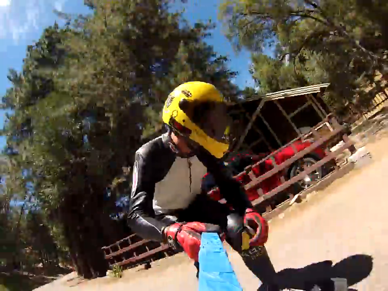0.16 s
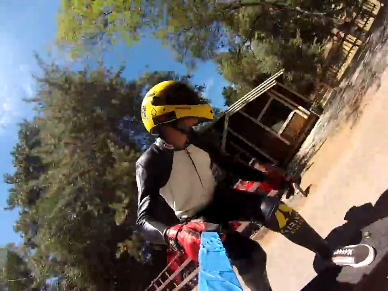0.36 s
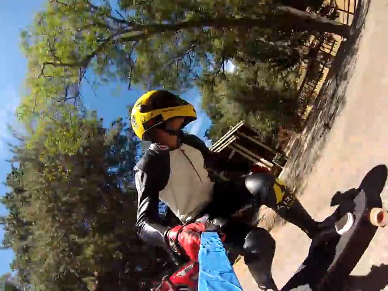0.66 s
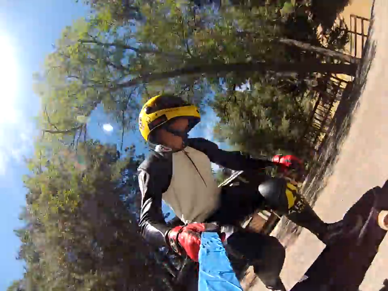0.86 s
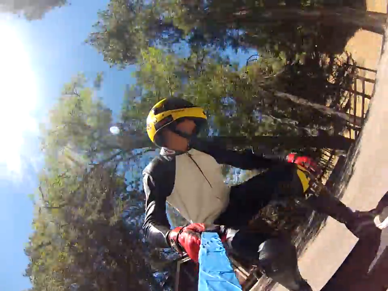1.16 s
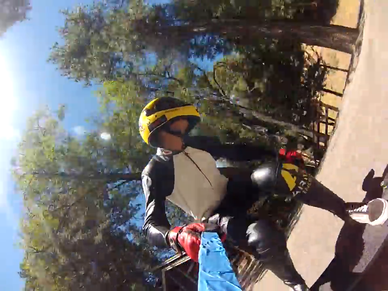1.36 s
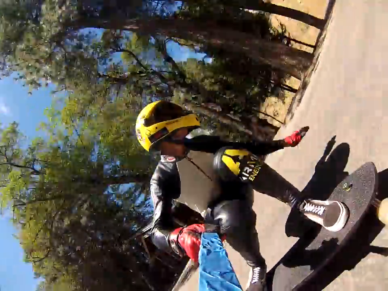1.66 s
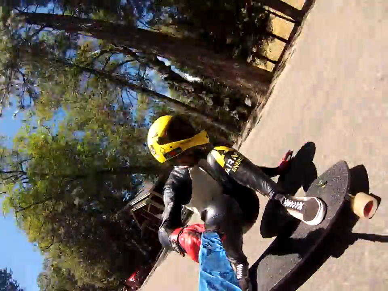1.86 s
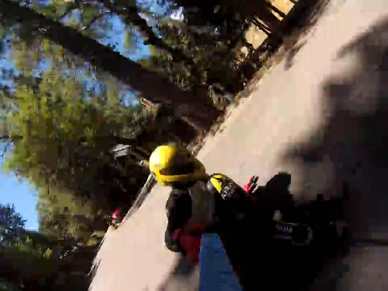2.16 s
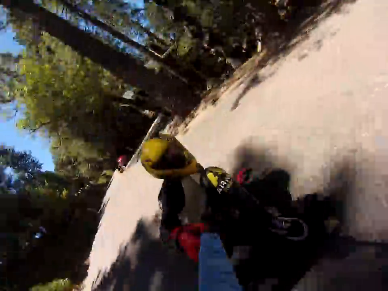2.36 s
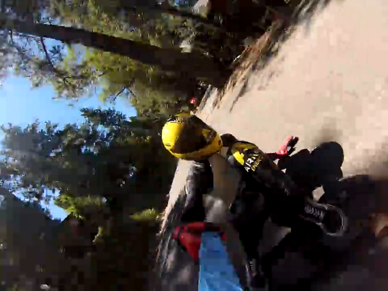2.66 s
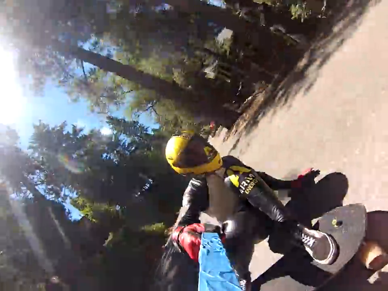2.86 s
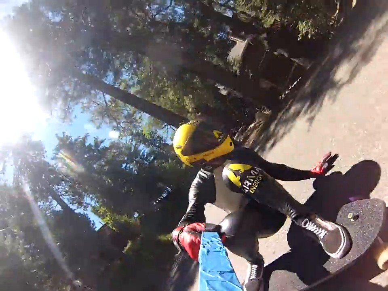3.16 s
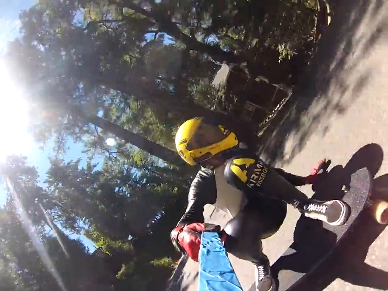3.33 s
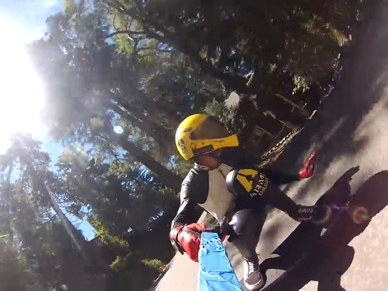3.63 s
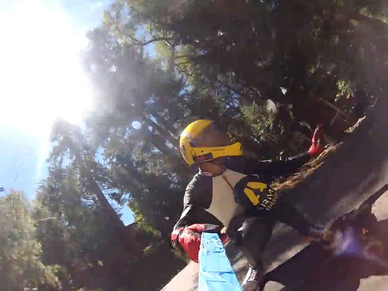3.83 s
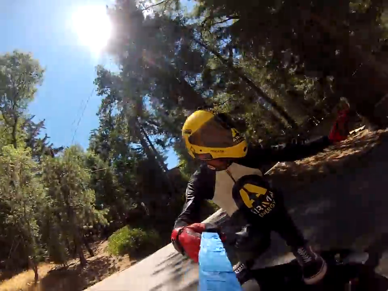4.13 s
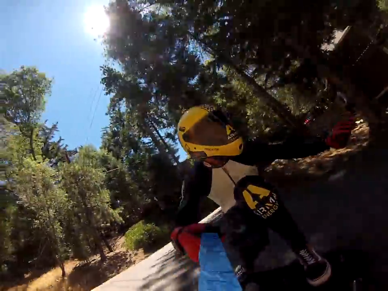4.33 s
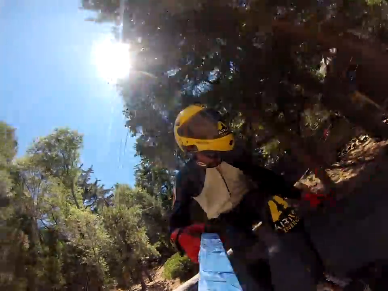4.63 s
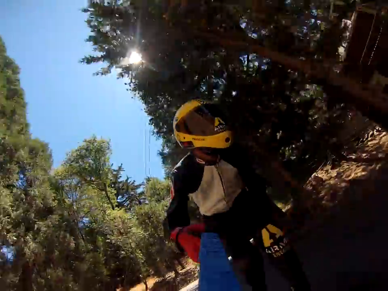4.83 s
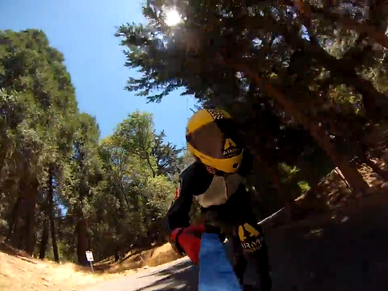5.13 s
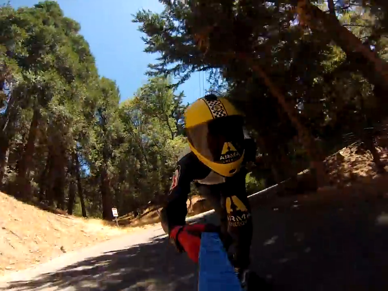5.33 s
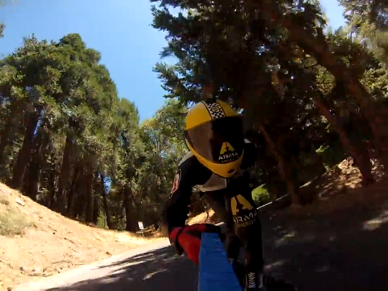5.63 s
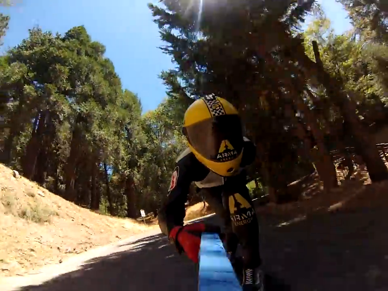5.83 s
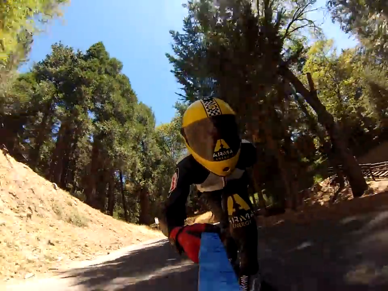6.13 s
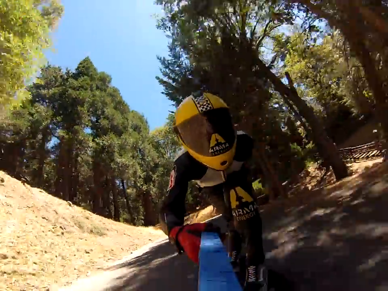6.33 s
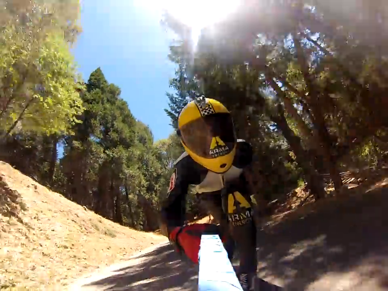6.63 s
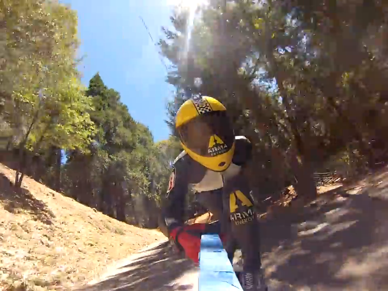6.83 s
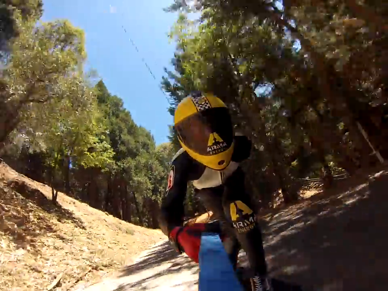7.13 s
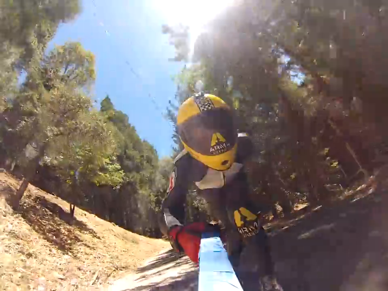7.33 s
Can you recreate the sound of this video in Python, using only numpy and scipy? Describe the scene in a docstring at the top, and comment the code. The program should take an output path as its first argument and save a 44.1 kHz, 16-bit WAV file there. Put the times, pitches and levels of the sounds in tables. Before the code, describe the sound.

Heavy low wind flutter and handling clatter come first, one knock standing out. Wheels rumble and ring on coarse pavement, then slide through a bend with a bright tearing scrape and deeper deck growl. The scrape fades to a faint whistle and quiet rolling, soft air puffs and scuffs follow, a sharp tick cracks, and the steady roll returns. Mostly central, very close, dry open air.

```python
"""A gust and a glove's rub on a pole come first, then sharp ticks and knocks, over a longboard on rough asphalt.
The rider holds a camera on that pole: eddies rock the air at its microphone and hits ring its housing.
Random road grain rings wheels, deck and a bright grit hiss; rushing air adds a broad roar.
In a long bend the wheels scrub sideways in a dense stick-slip hiss, then grip and roll on.
"""
import sys
import numpy as np
from scipy import signal
from scipy.fft import rfft, irfft
from scipy.io import wavfile
from scipy.ndimage import uniform_filter1d, map_coordinates

SR = 44100
rng = np.random.default_rng(int(sys.argv[2]) if len(sys.argv) > 2 else 0)


def log_audio(samples):
    """Write samples as a 16-bit WAV file to the path given in sys.argv[1]."""
    # one column per channel
    frames = np.atleast_2d(samples).T
    # limit to full scale, then quantise
    limited = np.clip(frames, -1, 1)
    pcm = np.round(limited * 32767).astype(np.int16)
    wavfile.write(sys.argv[1], SR, pcm)


N = 330309
TIME = np.arange(N) / SR
HZ = np.fft.rfftfreq(N, 1 / SR)


def amp(db):
    """Decibels to gain."""
    return 10 ** (np.asarray(db) / 20)


def evened(x):
    """Scales to unit rms."""
    return x / np.sqrt(np.mean(x ** 2) + 1e-20)


def level(rows):
    """Gain over time from a curve of decibels."""
    s, db = np.transpose(rows)
    return amp(np.interp(TIME, s, db))


def shape(points):
    """Gain over frequency from a short spectrum, drawn on a log axis."""
    hz, db = np.transpose(points)
    return amp(np.interp(np.log(HZ + 1), np.log(hz), db))


def body(modes, bed):
    """Gain over frequency of steep resonances standing on a broad bed."""
    peaks = 0
    for hz, width, db in modes:
        peaks = peaks + amp(db) ** 2 / (1 + ((HZ - hz) / width) ** 2 * 2) ** 2
    return np.sqrt(peaks + shape(bed) ** 2)


def ring(x, gain):
    """Passes x through a causal (minimum-phase) filter of this gain, so that clicks ring after they land."""
    cepstrum = irfft(np.log(gain + 1e-6), N)
    cepstrum[1:N // 2] *= 2
    cepstrum[N // 2:] = 0
    return irfft(rfft(x) * np.exp(rfft(cepstrum)), N)


def coloured(points):
    """Plain noise with this spectrum."""
    return irfft(rfft(rng.standard_normal(N)) * shape(points), N)


def tinted(x, bands):
    """Lifts or cuts narrow bands of a sound."""
    gain_db = sum(db / (1 + ((HZ - hz) / half_width) ** 2) for hz, half_width, db in bands)
    return ring(x, amp(gain_db))


def wander(rate_hz):
    """Slow random drift of unit rms, up to about this rate."""
    return evened(irfft(rfft(rng.standard_normal(N)) / (1 + (HZ / rate_hz) ** 2), N))


def grains(per_s, spread_db):
    """Random clicks from stones; a positive spread makes a few much larger, a negative one a few smaller."""
    size = amp(spread_db * np.minimum(rng.exponential(1, N), 4))
    sign = rng.choice([-1, 1], N)
    lands = rng.random(N) < per_s / SR
    return evened(size * sign * lands)


def bent(x, ratio):
    """Bends the pitch of a sound by a ratio that changes over time."""
    return map_coordinates(x, [np.cumsum(ratio)], order=3, mode="wrap")


def patchy(x, patchy_db, size):
    """Each region of the spectrum swells and sinks on its own, as the contact patch keeps changing."""
    z = signal.stft(x, nperseg=512, noverlap=384)[2]
    patches = uniform_filter1d(rng.standard_normal(z.shape), size=size[0], axis=0)  # across frequency
    patches = uniform_filter1d(patches, size=size[1], axis=1)  # across time
    return signal.istft(z * amp(patchy_db * evened(patches)), nperseg=512, noverlap=384)[1][:N]


def held(start, attack, end, release):
    """Rises from zero to one, holds, and is back at zero by the end."""
    return np.clip(np.minimum((TIME - start) / attack, (end - TIME) / release), 0, 1)


def swell(length, lean):
    """A smooth hump of this length; a lean under one brings its top forward."""
    return np.sin(np.pi * np.linspace(0, 1, round(max(length, .004) * SR)) ** lean) ** 2


def bump(middle, length):
    """A smooth rise to one and back, around this moment."""
    return np.cos(np.pi * np.clip((TIME - middle) / length, -.5, .5)) ** 2


def add(mix, s, sound):
    """Mixes a sound in at time s."""
    part = mix[max(round(s * SR), 0):][:len(sound)]
    part += sound[:len(part)]


def strike(modes, t):
    """Decaying modes after one blow, with a peak of one."""
    sound = 0
    for k, (hz, db, t60) in enumerate(modes):
        decay = np.exp(-np.log(1000) * t / t60)
        sound = sound + (-1) ** k * amp(db) * decay * np.sin(2 * np.pi * hz * t)
    return sound / abs(sound).max()


# the rider crouches into the bend, bringing the camera near the deck and out of the wind, then stands up
CROUCH_START_S, CROUCH_DOWN_S, CROUCH_END_S, CROUCH_UP_S = 0.037, 0.33, 5.09, 0.35


def crouching():
    """Zero while the rider stands, one in the crouch."""
    return held(CROUCH_START_S, CROUCH_DOWN_S, CROUCH_END_S, CROUCH_UP_S)


# the slide: the wheels break loose in the bend, and grip again
SLIDE_START_S, SLIDE_BREAK_S, SLIDE_END_S, SLIDE_GRIP_S = 1.56, 0.4, 3.62, 0.28


def drifting(fade):
    """Zero while the wheels grip, one while they slide."""
    return held(SLIDE_START_S, fade, SLIDE_END_S, fade)


# slow wind pressure on the microphone, before the wind trim: time_s, level_db
WIND_PRESSURE = [(0.4, -30.5), (1.5, -30.5), (2.45, -20), (3.0, -27.5), (4.7, -33.5), (5.6, -27),
                 (6.0, -31.5), (7.49, -37.5)]
# gusts on top of it, the first as the pole swings round: middle_s, level_db, length_s
WIND_GUSTS = [(0.097, -12.5, 0.22), (0.235, -15, 0.24), (0.936, -21.5, 0.13), (1.863, -29.5, 0.5),
              (2.17, -16.5, 0.047), (2.846, -25, 0.14), (3.167, -26.5, 0.14), (3.358, -23, 0.048),
              (5.076, -22.5, 0.04), (7.31, -31, 0.064)]
# spectrum of the wind pressure: frequency_hz, level_db
WIND_SPECTRUM = [(8, -30), (20, 0.5), (30, 4), (37, 0), (48, -11), (64, -20.5), (90, -28.5), (140, -38),
                 (300, -40.5), (1000, -101.5)]


def buffeting(wind_db=-1.0, steadiness=0.34, flutter_db=1.5):
    """Eddies shed by the camera rock the air about thirty times a second, harder in each gust."""
    swirl = signal.hilbert(coloured(WIND_SPECTRUM))
    strength = np.sqrt(uniform_filter1d(abs(swirl) ** 2, size=2200))
    pressure = level(WIND_PRESSURE) * amp(flutter_db * wander(rate_hz=8.4))
    for s, db, length in WIND_GUSTS:
        pressure = pressure + amp(db) * bump(s, length)
    # dividing by part of its own strength steadies the swirl
    return evened(swirl.real / strength ** steadiness) * pressure * amp(wind_db)


# rubs of the glove as the pole swings round, before the rub trim: start_s, level_db, length_s
GLOVE_RUBS = [(0.0, -29.5, 0.086), (0.047, -34, 0.059), (0.129, -30, 0.086), (0.188, -35, 0.12),
              (0.264, -36, 0.099)]
# spectrum of leather on the pole: frequency_hz, level_db
LEATHER_SPECTRUM = [(100, -8), (380, 3.5), (850, -10.5), (1100, -4), (1350, 4.5), (1850, -11), (2200, -5.5),
                    (2800, -18.5), (3450, -21), (4100, -33), (15000, -52)]


def rubbing(rub_db=-1.5, lean=0.32, catch_db=1.5):
    """Leather catches and slips on the pole in a dull, uneven rasp."""
    force = np.zeros(N)
    for s, db, length in GLOVE_RUBS:
        add(force, s, amp(db + rub_db) * swell(length, lean))
    slips = grains(per_s=4000, spread_db=2.0) * amp(catch_db * wander(rate_hz=97))
    return force * evened(ring(slips, shape(LEATHER_SPECTRUM)))


# before the bend the wheels ring flatter and wider; change of colour: frequency_hz, half_width_hz, change_db
ENTRY_TINT = [(1195, 53, 4.5), (1380, 66, -3.5), (2370, 220, 8.5), (2670, 97, -9), (3700, 200, 3)]
ENTRY_END_S, ENTRY_FADE_S = 2.05, 0.71


def entering(wheels):
    """The wheels' flatter ring gives way to a narrower one as the bend begins."""
    share = np.clip((ENTRY_END_S - TIME) / ENTRY_FADE_S, 0, 1)
    return share * tinted(wheels, ENTRY_TINT) + (1 - share) * wheels


# the load of the bend presses the deck's growl lower and louder, and leaves more slowly than it comes
LOAD_PEAK_S, LOAD_WIDTH_S, LOAD_EASE_S = 2.42, 0.4, 0.6
LOAD_SAG, LOAD_DB = 0.13, 2.5  # share of the pitch lost, and lift, at the peak


def loaded(deck):
    """Lowers the deck's pitch and lifts its level with the load in the bend."""
    width = np.where(TIME < LOAD_PEAK_S, LOAD_WIDTH_S, LOAD_EASE_S)
    load = np.exp(-((TIME - LOAD_PEAK_S) / width) ** 2)
    return bent(deck, 1 - LOAD_SAG * load) * amp(LOAD_DB * load)


# strength of the road's vibration in the wheels: time_s, level_db
ROAD_DRIVE = [(0.33, -50), (0.53, -46), (0.69, -43), (0.89, -44.5), (1.44, -46), (1.64, -43.5),
              (2.14, -34.5), (2.82, -37), (2.98, -39.5), (3.38, -48), (3.6, -52.5), (3.9, -56), (4.14, -55),
              (4.44, -49.5), (5.6, -43.5), (6.05, -44.5), (6.45, -46), (6.68, -44), (6.98, -47),
              (7.22, -41.5), (7.49, -47.5)]
CRUISE_DB = -43.5  # reference drive, at which grit hiss and rushing air are neither raised nor lowered
# resonances of the rolling wheels: frequency_hz, width_hz, level_db
WHEEL_RESONANCES = [(1170, 110, -11), (1351, 100, 0), (1492, 220, -2), (2085, 170, -11), (2322, 71, -11),
                    (2736, 150, -10.5), (3260, 124, -19)]
# noise between the wheel resonances: frequency_hz, level_db
WHEEL_NOISE = [(60, -30), (170, -18), (500, -18), (850, -25), (1030, -3.5), (1800, -12.5), (3000, -31.5),
               (5000, -35.5), (15000, -70)]
# resonances of the loaded deck: frequency_hz, width_hz, level_db
DECK_RESONANCES = [(328, 180, -7.5), (431, 77, 2.5), (489, 88, 4.5), (730, 65, -11)]
# noise between the deck resonances: frequency_hz, level_db
DECK_NOISE = [(40, -28), (68, 1), (150, -10.5), (270, -5.5), (600, -2), (1000, -28), (4000, -71)]
# resonances that fine grit excites: frequency_hz, width_hz, level_db
GRIT_RESONANCES = [(3700, 850, 3), (4090, 240, 7), (4700, 120, -0.5), (5090, 120, 2.5), (5840, 170, 2.5),
                   (6120, 1050, -1), (6810, 360, -3), (7850, 530, -3.5), (11700, 620, -15)]
# noise between the grit resonances: frequency_hz, level_db
GRIT_NOISE = [(500, -26), (2500, 12.5), (4500, -16), (8500, -8), (10500, -15.5), (15000, -17.5)]
# the grit hiss comes up as the camera swings down towards the road
SWING_S, SWING_DB = 0.52, -3.5
# on the straight the board gathers speed and the grit hiss grows
STRAIGHT_S, GATHER_DB_PER_S = 5.6, 1.5


def rolling(road, ring_db=1.0, growl_db=-18.5, grit_db=-59, near_growl_db=14.5, near_grit_db=6.0, grit_follow=0.55,
            ring_sway_db=1.2, grit_sway_db=1.37, slide_db=-14, waver=0.014, flutter_db=1.0):
    """Road grain rings wheels, deck and grit; coarser patches lift all three, the crouch lifts deck and grit."""
    drive, near = level(ROAD_DRIVE), crouching()
    wheels = evened(ring(grains(per_s=5000, spread_db=2.5), body(WHEEL_RESONANCES, WHEEL_NOISE)))
    # the wheels' ring wavers and flutters as the load shifts between them
    wheels = bent(wheels, 1 + waver * wander(rate_hz=9.06)) * amp(flutter_db * wander(rate_hz=15))
    wheels = entering(wheels) * amp(ring_db)
    deck = evened(ring(grains(per_s=3000, spread_db=-1.5), body(DECK_RESONANCES, DECK_NOISE)))
    deck = loaded(deck) * amp(growl_db + near_growl_db * near)
    low = drive * (wheels + deck) * amp(ring_sway_db * road)

    grit = evened(ring(grains(per_s=7600, spread_db=2.5), body(GRIT_RESONANCES, GRIT_NOISE)))
    grit = grit * amp(slide_db * drifting(fade=0.98))  # sliding wheels pick up less grit
    grit = grit * (drive / amp(CRUISE_DB)) ** grit_follow
    grit = grit * amp(SWING_DB * np.maximum(1 - (TIME / SWING_S) ** 2, 0))
    grit = grit * amp(GATHER_DB_PER_S * np.maximum(TIME - STRAIGHT_S, 0))
    return low + grit * amp(grit_db + near_grit_db * near + grit_sway_db * road)


# spectrum of the rushing air: frequency_hz, level_db
RUSH_SPECTRUM = [(60, -3), (200, 7), (450, -2), (750, 1), (1050, 1.5), (1800, -37), (5000, -31.5)]


def rushing(rush_db=-52.5, sway_db=2.0, shelter_db=-7, follow=0.39):
    """Air round rider and pole roars, flutters and grows with the rolling; the crouch shelters the camera."""
    roar = evened(coloured(RUSH_SPECTRUM)) * (level(ROAD_DRIVE) / amp(CRUISE_DB)) ** follow
    return roar * amp(rush_db + sway_db * wander(rate_hz=18.0) + shelter_db * crouching())


# spectrum of the hiss that differs between the channels: frequency_hz, level_db
HISS_SPECTRUM = [(100, -8), (1500, -25), (4000, -8), (7500, 5), (15000, 4.5)]
HISS_DB = -81.5


def hissing(crosswind_db=-53, crosswind_s=0.38, lean=0.75):
    """What differs between left and right: faint hiss, and a flutter of crosswind as the pole swings round."""
    out = evened(coloured(HISS_SPECTRUM)) * amp(HISS_DB)
    gust = swell(crosswind_s, lean)
    add(out, 0, amp(crosswind_db) * gust * evened(coloured(EDDY_SPECTRUM))[:len(gust)])
    return out


# large eddies that break on the microphone: start_s, peak_db, centre_hz (top_ratio sets the cutoff above it)
EDDIES = [(0.03, -19.5, 69.3), (0.128, -30, 172), (0.286, -23, 150), (0.901, -27.5, 110), (1.8, -30, 85),
          (2.66, -24.5, 300), (2.755, -25, 79.5), (3.768, -36, 603), (3.812, -38, 238), (3.926, -39, 260),
          (4.056, -35.5, 220), (4.156, -32, 170), (4.549, -38.5, 380), (4.739, -30.5, 150),
          (4.836, -27, 188), (5.042, -28.5, 144), (5.179, -29, 287), (5.282, -25.5, 170), (5.326, -23, 137),
          (5.402, -25, 119)]
# spectrum of an eddy: frequency_hz, level_db
EDDY_SPECTRUM = [(30, -5.5), (85, 7.5), (150, 0.5), (290, -1.5), (450, 1.5), (800, -8), (2000, -23)]
EDDY_S = 0.042  # length of one eddy


def puffs(puff_db=0.0, lean=0.52, top_ratio=1.12):
    """Single eddies hit the microphone, each a soft, short thud of low noise."""
    out, hump = np.zeros(N), swell(EDDY_S, lean)
    noise = coloured(EDDY_SPECTRUM)
    for s, db, hz in EDDIES:
        dull = signal.lfilter(*signal.butter(3, top_ratio * hz, fs=SR), noise)
        thud = hump * dull[round(s * SR):][:len(hump)]
        add(out, s, amp(db + puff_db) * thud / abs(thud).max())
    return out


# sharp ticks, before the trims of tick and crack: start_s, level_db, treble_share_db
SHARP_TICKS = [(0.08, -13, -25.5), (0.2378, -29, -26), (0.317, -22.5, -30), (0.8148, -27.5, -27),
               (1.039, -28.5, -36), (1.234, -25, -32), (1.442, -37, -25), (1.5976, -23.5, -27),
               (1.9094, -28, -15), (2.094, -25, -27), (2.1966, -20, -26), (2.532, -16.5, -42),
               (2.668, -22.5, -47), (3.0031, -23, -36), (3.5077, -38, -17), (3.548, -33, -19),
               (4.1188, -29.5, -54), (4.7576, -34, -33), (4.917, -35, -24), (4.9742, -37, -45),
               (5.3828, -14, -19)]
# ringing of the camera housing, detuned at each hit: frequency_hz, level_db, t60_s
HOUSING_MODES = [(1340, 0, 0.012), (2045, 5, 0.0043), (2424, -0.5, 0.012), (2870, -13, 0.023),
                 (3300, -14, 0.016), (4550, -24, 0.029)]
# highest ringing of the housing, brought in by the treble share: frequency_hz, level_db, t60_s
CRACK_MODES = [(7850, -3, 0.0073), (8820, -2, 0.005), (11100, -1, 0.0031), (14800, -11, 0.0059)]


def ticks(tick_db=3.0, crack_db=6.0, detune=0.054, rattle_db=-9.0, rattle_s=0.0035,
          low_hz=1400, high_hz=3000, contact_s=0.000084):
    """Hard little hits: a treble crack, a contact rattle and a brief housing ring, varying with the spot."""
    out, t = np.zeros(N), np.arange(SR // 20) / SR
    spots = 1 + detune * (2 * rng.random((len(SHARP_TICKS), len(HOUSING_MODES))) - 1)
    contacts = rng.standard_normal((len(SHARP_TICKS), len(t))) * np.exp(-t / rattle_s)
    rattles = signal.lfilter(*signal.butter(2, [low_hz, high_hz], "bandpass", fs=SR), contacts)
    onset = 1 - np.exp(-t / contact_s)
    for (s, db, treble_db), spot, rattle in zip(SHARP_TICKS, spots, rattles):
        modes = [(hz * k, mode_db, t60) for (hz, mode_db, t60), k in zip(HOUSING_MODES, spot)]
        hit = amp(tick_db) * strike(modes, t) * onset
        hit = hit + amp(rattle_db) * rattle / abs(rattle).max()
        crack = amp(treble_db + crack_db) * strike(CRACK_MODES, t)
        add(out, s, amp(db) * (hit + crack))
    return out


def blows(rows, modes, rattle, rattle_s=0.012):
    """Blows on one set of modes, each with a contact rattle; a higher pitch ratio also rings shorter."""
    out, t = np.zeros(N), np.arange(SR // 10) / SR
    contact = swell(rattle_s, lean=0.69)
    for (s, db, pitch), chatter in zip(rows, rng.standard_normal((len(rows), len(t)))):
        impact = np.r_[1, rattle * contact * chatter[:len(contact)]]
        sound = np.convolve(strike(modes, t * pitch), impact)
        add(out, s, amp(db) * sound / abs(sound).max())
    return out


# dull knocks, before the knock trim: start_s, level_db, pitch_ratio
POLE_KNOCKS = [(0.1375, -27, 1.1), (0.159, -8, 0.977), (0.2109, -21, 1.18), (0.2436, -29, 1.07),
               (0.2743, -33, 1.03), (0.2915, -31, 1.06), (2.5302, -19.5, 1.25), (4.1186, -35, 1.17)]
# ringing of the pole at a pitch ratio of one: frequency_hz, level_db, t60_s
POLE_MODES = [(393, -2, 0.015), (724, -5, 0.026), (1188, 4, 0.024), (1340, 3.5, 0.015), (1690, -7, 0.019),
              (2260, -22, 0.02)]
# jolts that thump through board and pole: start_s, peak_db, pitch_ratio
ROAD_JOLTS = [(0.1372, -23, 0.75), (0.2187, -20.5, 1.12), (0.9098, -30, 1.5), (2.1652, -21, 1.66),
              (2.246, -24.5, 1.35), (2.5303, -16.5, 1.15), (2.6655, -23, 1.4)]
# the pole's low bending modes at a pitch ratio of one: frequency_hz, level_db, t60_s
FLEX_MODES = [(210, 2.5, 0.025), (311, -3.5, 0.042)]


def knocks(knock_db=0.5, jolt_db=0.0):
    """The pole knocks now and then, and flexes with a thump at each jolt."""
    grip = amp(knock_db) * blows(POLE_KNOCKS, POLE_MODES, rattle=0.044)
    return grip + amp(jolt_db) * blows(ROAD_JOLTS, FLEX_MODES, rattle=0.031)


# grit pinched under a wheel: start_s, peak_db, pitch_hz
GRIT_CHIRPS = [(1.441, -46, 4806), (2.098, -39, 5500), (3.101, -33, 5200), (3.158, -32, 5140),
               (7.1915, -43.5, 6000), (7.199, -52, 5850)]
CHIRP_S, CHIRP_WIDTH = 0.0086, 0.073  # length, and half the bandwidth as a share of the pitch


def chirps(chirp_db=0.0, lean=0.34):
    """A pinched stone squeaks for an instant in a narrow, high band."""
    out, hump = np.zeros(N), swell(CHIRP_S, lean)
    for (s, db, hz), slips in zip(GRIT_CHIRPS, rng.standard_normal((len(GRIT_CHIRPS), SR // 10))):
        band = signal.butter(2, [hz * (1 - CHIRP_WIDTH), hz * (1 + CHIRP_WIDTH)], "bandpass", fs=SR)
        squeak = hump * signal.lfilter(*band, slips)[-len(hump):]
        add(out, s, amp(db + chirp_db) * squeak / abs(squeak).max())
    return out


# resonances of the scrubbing wheels: frequency_hz, width_hz, level_db
SCRUB_RESONANCES = [(1390, 45, 12.5), (2059, 115, 11), (2530, 570, 4.5), (3050, 67, -2), (3200, 46, 7),
                    (3390, 300, 3.5), (4145, 150, -0.5), (4580, 120, -5.5), (5030, 210, -0.5),
                    (6000, 600, -10), (6640, 1000, -8.5), (7900, 270, -24)]
# noise between the scrub resonances: frequency_hz, level_db
SCRUB_NOISE = [(200, -31), (700, 3), (900, -6.5), (1800, -23), (3800, -1), (5500, -16), (8000, -11.5),
               (8500, -20.5), (12000, -23.5), (15000, -28.5)]
# base level, how far it falls towards grip, and how far it eases late as speed is shed
SCRUB_DB, SCRUB_RANGE_DB, SCRUB_EASE_DB = -36, 18.5, 14.5
# the edge of the wheels bites once as they break loose
BITE_S, BITE_WIDTH_S, BITE_DB = 1.92, 0.019, 13
# the finest sizzle fades out from this moment
SIZZLE_HZ, SIZZLE_FADE_START_S, SIZZLE_FADE_S = 8300, 3, 0.89


def scrubbing(road, sway_db=1.75, rasp_db=1.3, pebble_db=-6, light_db=5.5, light_hz=1500, light_s=2.9,
              waver=0.008, bite_hz=2600):
    """Urethane sticks and slips on countless stones in a dense hiss, and snaps over the larger ones."""
    slips = grains(per_s=16000, spread_db=1.5) * amp(rasp_db * wander(rate_hz=160))
    slips += amp(pebble_db) * grains(per_s=140, spread_db=3.0)
    scrape = ring(slips, body(SCRUB_RESONANCES, SCRUB_NOISE))
    scrape = evened(patchy(scrape, patchy_db=1.6, size=(5, 6)))
    # the resonances waver as the wheels flex
    scrape = bent(scrape, 1 + waver * wander(rate_hz=7.16))
    # the bite is a bright rip
    rip = scrape - signal.filtfilt(*signal.butter(2, bite_hz, fs=SR), scrape)
    bite = np.exp(-((TIME - BITE_S) / BITE_WIDTH_S) ** 2)
    scrape = scrape + rip * (amp(BITE_DB * bite) - 1)
    # the rider's weight comes off the wheels late in the bend, and the scrape turns thinner and brighter
    lightness = np.tanh(2 * (TIME - light_s))
    dark = signal.filtfilt(*signal.butter(2, light_hz, fs=SR), scrape)
    bright = scrape - dark
    scrape = dark * amp(-light_db * lightness / 2) + bright * amp(light_db * lightness / 2)
    # as speed is shed the finest sizzle goes first
    sizzle = scrape - signal.filtfilt(*signal.butter(4, SIZZLE_HZ, fs=SR), scrape)
    scrape = scrape - sizzle * np.clip((TIME - SIZZLE_FADE_START_S) / SIZZLE_FADE_S, 0, 1)

    slip = held(SLIDE_START_S, SLIDE_BREAK_S, SLIDE_END_S, SLIDE_GRIP_S)
    progress = np.clip((TIME - SLIDE_START_S) / (SLIDE_END_S - SLIDE_START_S), 0, 1)
    force_db = SCRUB_DB - SCRUB_RANGE_DB * (1 - slip) - SCRUB_EASE_DB * progress ** 4
    return scrape * drifting(fade=0.022) * amp(force_db + sway_db * road)


# scuffs of shoes and wheels, before the scuff trim: start_s, level_db, length_s
SHOE_AND_WHEEL_SCUFFS = [(1.913, -31, 0.025), (2.721, -23.5, 0.027), (2.868, -30, 0.17),
                         (4.237, -37, 0.054), (4.323, -39, 0.027), (4.355, -34, 0.043), (4.455, -38, 0.061),
                         (4.71, -43, 0.076)]
# spectrum of a scuff: frequency_hz, level_db
SCUFF_SPECTRUM = [(500, -12), (1400, 10.5), (1780, 6), (2200, 7.5), (2850, 5.5), (3600, -11), (4150, -7.5),
                  (4900, -25), (5900, -11.5), (8000, -23.5), (15000, -48)]
# the wheels chatter in weaker, random scuffs while the board straightens
CHATTER_START_S, CHATTER_S, CHATTER_DB = 3.86, 2.43, -51.5


def scuffs(scuff_db=-7.0, lean=0.53, chatter_lean=0.6, uneven_db=7.0):
    """Soles and wheels skip sideways in short gritty bursts."""
    force = np.zeros(N)
    add(force, CHATTER_START_S, amp(CHATTER_DB) * swell(CHATTER_S, chatter_lean))
    force *= amp(uneven_db * np.tanh(wander(rate_hz=43)))
    for s, db, length in SHOE_AND_WHEEL_SCUFFS:
        add(force, s, amp(db + scuff_db) * swell(length, lean))
    return force * evened(ring(grains(per_s=5900, spread_db=3.0), shape(SCUFF_SPECTRUM)))


# whistle of the wheels as they find grip: frequency_hz, width_hz, level_db
GRIP_RESONANCES = [(4080, 53, 3), (11700, 1100, -18)]
# noise around the whistle: frequency_hz, level_db
GRIP_NOISE = [(2000, -52), (9000, -28), (13500, -29), (15000, -26)]
GRIP_S, GRIP_LENGTH_S, GRIP_DB = 3.45, 0.66, -66.5


def gripping():
    """The last of the slide thins to a faint whistle of noise in a narrow resonance."""
    force = np.zeros(N)
    add(force, GRIP_S, amp(GRIP_DB) * swell(GRIP_LENGTH_S, lean=0.49))
    return force * evened(ring(rng.standard_normal(N), body(GRIP_RESONANCES, GRIP_NOISE)))


# hollows in the colour of the road sound, as the housing passes it: frequency_hz, half_width_hz, change_db
HOUSING_HOLLOWS = [(1046, 52, -10.5), (1767, 36, -9.5), (2676, 110, -5.5), (3800, 21, -3), (4950, 28, -6),
                   (8350, 150, -4.5)]
# the wheels dig in or skip, and their noise surges or drops: middle_s, change_db, length_s
WHEEL_SURGES = [(1.699, 2, 0.043), (2.797, -7, 0.062), (3.01, 0.5, 0.03), (3.243, 2.5, 0.027),
                (3.453, 5.5, 0.1), (4.298, -3, 0.038), (4.695, -5, 0.025), (5.551, 6.5, 0.033),
                (6.082, 3.5, 0.099), (5.964, 2, 0.065), (6.306, 2.5, 0.12), (6.678, 5, 0.022)]


def scene():
    """Nearly everything is heard in the centre; only faint hiss and crosswind spread to the sides."""
    road = wander(rate_hz=89)  # patches of coarser and smoother road
    wind = buffeting() + rushing() + puffs()
    handling = rubbing() + ticks() + knocks()
    board = patchy(rolling(road), patchy_db=1.37, size=(6, 14)) + scrubbing(road) + scuffs()
    board = tinted(board, HOUSING_HOLLOWS)
    board = board * amp(sum(db * bump(s, length) for s, db, length in WHEEL_SURGES))
    centre = wind + handling + board + chirps() + gripping()
    side = hissing()
    return np.array([centre + side, centre - side])


EDGE_HZ = 15350


def record(dry):
    """The camera's band limit, a steep low-pass, with soft ends."""
    low_pass = signal.firwin(255, EDGE_HZ, window=("kaiser", 8), fs=SR)
    ends = signal.windows.tukey(N, .002)
    return signal.oaconvolve(dry * ends, low_pass[None], "same")


dry = scene()
out = record(dry)
log_audio(out)
```